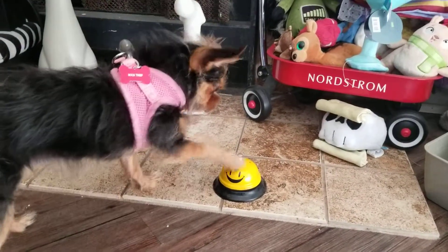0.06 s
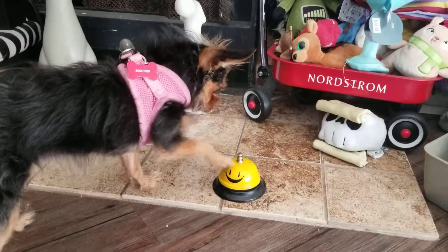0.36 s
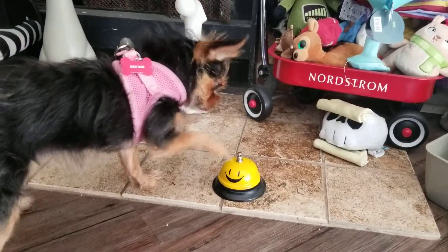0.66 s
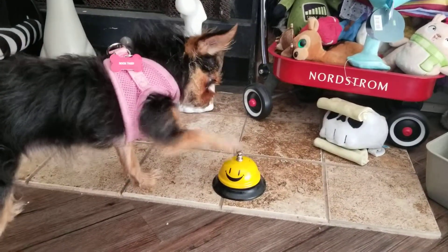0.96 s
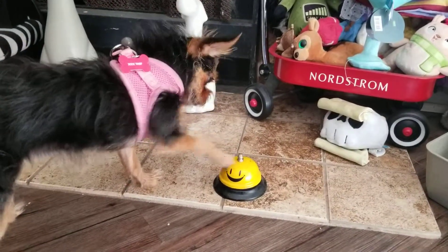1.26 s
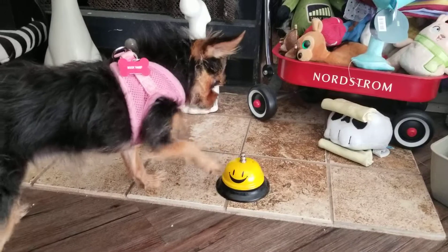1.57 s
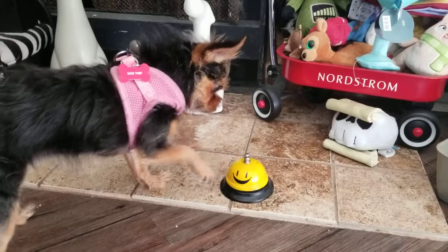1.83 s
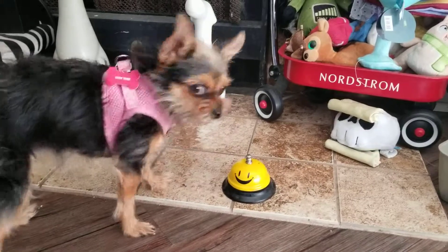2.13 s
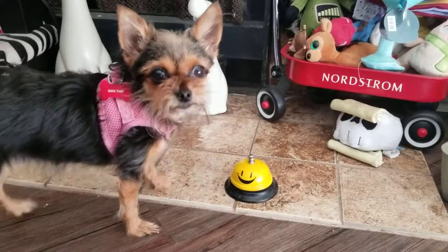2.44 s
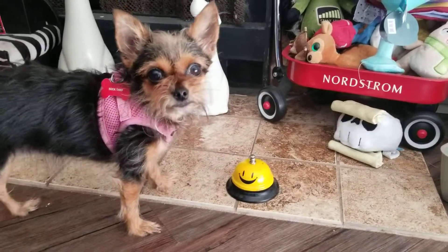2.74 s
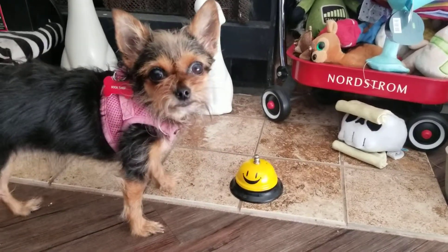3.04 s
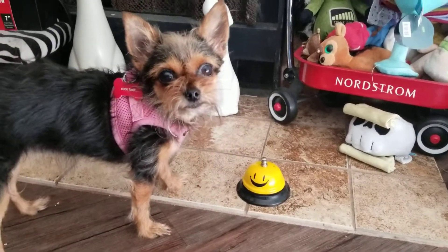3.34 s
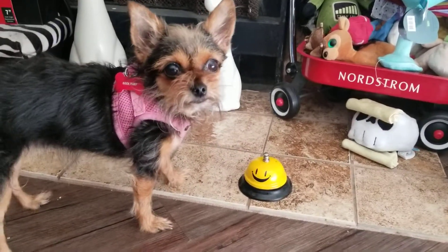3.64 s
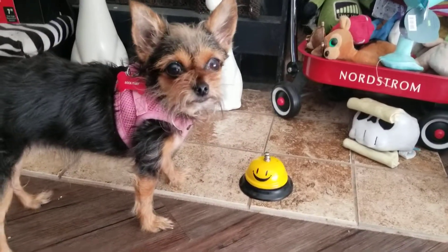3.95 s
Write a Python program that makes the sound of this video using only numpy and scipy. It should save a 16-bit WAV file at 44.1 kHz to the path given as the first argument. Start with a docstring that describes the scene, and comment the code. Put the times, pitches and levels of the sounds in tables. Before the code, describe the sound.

A small desk bell rings six times in quick succession, then fades under microphone bumps.

```python
"""Dog ringing a desk bell

A small dog paws a desk bell six times on a tiled hearth in a quiet room. A claw ticks, the
plunger rattles, the clapper clacks and the dome rings in beating pairs of modes. Up close,
fingers shift on the phone and bump and scrape its left microphone port."""
import sys
import numpy as np
from scipy import signal
from scipy.fft import rfft, irfft
from scipy.io import wavfile

SR = 44100
rng = np.random.default_rng(int(sys.argv[2]) if len(sys.argv) > 2 else 0)


def wav_out(sig):
    """Save sig, one row per channel (or a flat mono array), as 16-bit PCM at SR to the path in sys.argv[1]."""
    wavfile.write(sys.argv[1], SR, np.round(np.clip(np.atleast_2d(sig).T, -1, 1) * 32767).astype(np.int16))


N = 176400
ROOM_T60_S = .4


def undb(db):
    """Decibels to gain."""
    return 10 ** (np.asarray(db) / 20)

def clock():
    """Time of each sample in seconds."""
    return np.arange(N) / SR

def unit(x):
    """Scale to rms 1."""
    return x / np.sqrt(np.mean(x ** 2))

def colour(x, curve):
    """EQ by a curve of (f/Hz, gain/dB) points."""
    hz, db = np.array(curve).T
    f = np.maximum(np.arange(N // 2 + 1) * SR / N, 1)
    return irfft(rfft(x) * undb(np.interp(np.log(f), np.log(hz), db)), N)

def noise(curve, channels=2):
    """Coloured noise of rms 1, unrelated between channels."""
    return unit(colour(rng.standard_normal((channels, N)), curve))

def resonate(x, hz, width_hz):
    """One resonant band-pass."""
    return signal.lfilter(*signal.iirpeak(hz, hz / width_hz, fs=SR), x)

def decay(start, t60):
    """Instant attack, exponential tail."""
    age = clock() - start
    return (age >= 0) * np.exp(-np.log(1000) * np.maximum(age, 0) / t60)

def swells(rows):
    """Envelope of overlapping gestures, each a smooth rise and fall."""
    t = clock()
    return np.sqrt(sum(undb(db) ** 2 * np.exp(-2 * np.maximum((s - t) / rise, (t - s) / fall) ** 2)
                       for s, rise, fall, db in rows))

def wander(per_s):
    """Smooth random drift at each port, spread near 1."""
    steps = np.arange(N // 10)
    targets = rng.standard_normal((2, len(steps)))
    return np.array([np.interp(clock() * per_s, steps, row) for row in targets])

def shade(x, curve):
    """The hand screens the left port, dulling that side."""
    return np.array([colour(x[0], curve), x[1]])

# Room tone EQ (f/Hz, gain/dB)
ROOM_TONE_EQ = [(25, 4), (80, 0.5), (210, -5.5), (330, -17.5), (480, -14), (1000, -10.5), (2000, -12.5),
                (3300, -10.5), (6000, -17), (10000, -23), (15500, -27.5)]
# Its extra EQ on the left (f/Hz, gain/dB)
TONE_SHADE = [(1000, 4.5), (3000, -6.5), (12000, -20)]
# Faint hum lines (f/Hz, level/dB)
HUM_LINES = [(298, -63), (362, -65.5)]
def room_tone():
    """The bed: soft room noise with two wavering hum lines."""
    hum = sum(undb(db) * unit(resonate(rng.standard_normal((2, N)), hz, width_hz=1.9))
              for hz, db in HUM_LINES)
    return hum + undb(-56) * shade(noise(ROOM_TONE_EQ), TONE_SHADE)

# Shifts of grip (crest t/s, rise/s, fall/s, level/dB)
GRIPS = [(.89, 0.024, 0.055, -38.5), (1.36, 0.025, 0.081, -33.5), (1.78, .04, 0.08, -37),
         (1.96, 0.049, 0.048, -27), (2.32, 0.036, .11, -21.5), (2.66, 0.091, 0.036, -40.5),
         (2.89, 0.053, 0.19, -36.5), (3.175, 0.018, 0.023, -29.5), (3.3, 0.0059, 0.03, -37.5),
         (3.68, 0.1, 0.16, -33)]
# Case rumble EQ (f/Hz, gain/dB)
RUMBLE_EQ = [(20, -20), (45, -2.5), (90, -2), (160, -8), (300, -25), (700, -32), (2000, -72)]
def grip(hold_db=-50):
    """The hand flexes the case: a faint rumble that swells when the grip shifts."""
    return noise(RUMBLE_EQ, channels=1)[0] * np.hypot(swells(GRIPS), undb(hold_db))

# Light finger slides (crest t/s, rise/s, fall/s, level/dB)
GLIDES = [(3.2, 0.056, 0.15, -47), (3.84, 0.36, 0.082, -44)]
# Skin hiss EQ (f/Hz, gain/dB)
GLIDE_EQ = [(150, 2), (450, 1.5), (1200, -4), (2500, -11), (6000, -46.5), (12000, -38)]
def glides():
    """Skin glides beside the port with a soft, dark hiss."""
    return noise(GLIDE_EQ, channels=1)[0] * swells(GLIDES)

# Finger drags (crest t/s, rise/s, fall/s, level/dB)
SCRAPES = [(1.368, 0.018, 0.014, -31), (2.355, 0.044, 0.027, -26.5), (2.381, 0.0031, 0.0021, -17.5),
           (2.451, 0.052, 0.02, -31), (3.181, 0.0033, 0.0041, -35), (3.666, 0.027, 0.012, -22.5),
           (3.735, 0.025, 0.039, -37.5)]
# Skin crackle EQ (f/Hz, gain/dB)
CRACKLE_EQ = [(100, 4.5), (500, -3), (1500, -4.5), (4000, -7.5), (7200, -23), (10500, -15.5), (16000, -31)]
def scrapes(slips_per_s=1300, scatter_db=4.5):
    """Skin sticks and slips over the port in dense clicks of very uneven size."""
    slipping = rng.random(N) < slips_per_s / SR
    slips = slipping * undb(scatter_db * np.minimum(rng.exponential(size=N), 4))
    return unit(colour(slips - slips.mean(), CRACKLE_EQ)) * swells(SCRAPES)

# Finger bumps on the port (t/s, peak level/dB, width/ms, low cut f/Hz)
BUMPS = [(0.9502, -21, 0.23, 163), (1.046, -9, 0.62, 129), (1.3639, -18.5, 0.14, 120),
         (1.3686, -7.5, 0.078, 130), (1.4294, -10, 0.16, 222), (1.6925, -25.5, 0.53, 131),
         (1.9393, -13, 0.78, 107), (2.195, -24, 0.071, 300), (2.227, -23, 0.055, 300),
         (2.302, -6, 0.058, 81.5), (2.3111, -11.5, 1.3, 45.3), (2.3329, -0.5, 0.056, 90),
         (2.3369, -2.5, 0.25, 158), (2.3474, -7, 0.041, 200), (2.3529, -13, 0.04, 400),
         (2.3824, -8.5, 0.035, 397), (2.4396, -12, 0.04, 297), (2.449, -16, 0.022, 400),
         (2.543, -29.5, 0.46, 195), (2.8636, -14, 0.23, 60), (2.9286, -21, 0.13, 88),
         (3.116, -16.5, 0.11, 424), (3.1811, -12, 0.11, 606.5), (3.462, -18.5, 0.064, 147),
         (3.6208, -10.5, 0.054, 132), (3.6286, -4, 0.071, 128), (3.6301, -4.5, 0.1, 416),
         (3.6583, -2, 0.064, 200), (3.6702, -2, 0.73, 92), (3.728, -17.5, 0.026, 1230),
         (3.7333, -15, 0.024, 1250), (3.793, -25.5, 0.6, 117), (3.97, -31.5, 0.36, 181)]
def bumps():
    """Each touch is one pressure pulse that swings back as the air leaks from the port."""
    t, out = clock(), np.zeros(N)
    for s, db, width_ms, low_hz in BUMPS:
        near = abs(t - s) < .1
        widths_away = np.minimum(abs(t[near] - s) * 1000 / width_ms, 50)
        leak = signal.butter(2, low_hz, "high", fs=SR, output="sos")
        pulse = signal.sosfilt(leak, 1 / np.cosh(widths_away))
        out[near] += undb(db) * pulse / abs(pulse).max()
    return out

# Claw hit (t/s, level/dB)
TICKS = [(0.105, -30)]
# Tick EQ (f/Hz, gain/dB)
TICK_EQ = [(2000, -26), (7000, -16), (15000, 6)]
def claw():
    """A claw meets the tile with a tiny, dry, bright tick."""
    return noise(TICK_EQ) * sum(undb(db) * decay(s, t60=.0092) for s, db in TICKS)

# Short resonances of plunger and clapper (f/Hz, width/Hz, gain/dB)
WORKS = [(3016, 110, 14.5), (4520, 54, 11.5), (4910, 77, 0.5), (6050, 44, 5.5), (10630, 34, 6)]
def clatter(curve, chatter_db=5):
    """Chattering contact noise rings the bell's works: the texture of rattle and clack."""
    contact = noise(curve) * undb(chatter_db * wander(per_s=180)[0])
    return unit(contact + sum(undb(db) * resonate(contact, hz, width) for hz, width, db in WORKS))

# Paw on the plunger, and the plunger springing back (t/s, level/dB)
RATTLES = [(.1, -52), (0.285, -42.5), (0.336, -35), (0.583, -34), (0.67, -43), (0.786, -35), (0.923, -37),
           (1.011, -41.5), (1.242, -44.5), (1.46, -38.5), (1.525, -33), (1.761, -31), (1.829, -36)]
# Rattle EQ (f/Hz, gain/dB)
RATTLE_EQ = [(300, -11), (900, -0.5), (1450, 10.5), (2300, -0.5), (4800, 6.5), (8000, 2.5), (11500, -1),
             (15000, 2)]
def rattles(tail_db=-3):
    """The plunger rattles in tight bursts, each with a room tail."""
    power = sum(undb(db) ** 2 * (decay(s, t60=.03) ** 2 + (undb(tail_db) * decay(s, ROOM_T60_S)) ** 2)
                for s, db in RATTLES)
    return np.sqrt(power) * clatter(RATTLE_EQ)

def tinkles(modes=36, band_hz=(3600, 15500), attack_s=.004, t60=.16, trim_db=-2.5):
    """Each rattle rings a fresh cluster of short, high modes in the loose metal parts."""
    out, age = np.zeros((2, N)), np.arange(SR // 8) / SR
    envelope = (1 - np.exp(-age / attack_s)) * np.exp(-np.log(1000) * age / t60)
    for s, db in RATTLES:
        hz = np.exp(rng.uniform(*np.log(band_hz), (modes, 1)))
        size = rng.exponential(size=(modes, 1))
        partials = size * np.sin(2 * np.pi * (hz * age + rng.random((2, modes, 1))))
        ring = partials.sum(axis=1) / np.sqrt(np.sum(size ** 2) / 2)
        start = int(s * SR)
        out[:, start:start + len(age)] += undb(db + trim_db) * ring * envelope
    return out

# Hits on the bell (t/s, level/dB, ping boost/dB, shrill boost/dB, clack and high-mode boost/dB)
STRIKES = [(0.3228, -10, 2, 0, 17), (0.5723, -6, 6.5, 0.5, 14.5), (0.8193, -4, -1.5, 2, 9),
           (1.268, 0, 0.5, 0, 9), (1.486, -3, 6.5, 4.5, 15), (1.7328, -2.5, 5, 2, 8)]
# Clack EQ (f/Hz, gain/dB)
CLACK_EQ = [(200, -34), (800, -28.5), (1400, -1.5), (2300, -17.5), (3600, -5), (4900, 2.5), (6400, 5),
            (7400, -2.5), (10000, -4), (11500, 3.5), (13500, -13), (15500, 2.5)]
def clacks(dry_db=-26, tail_db=-39.5):
    """The clapper hits the dome: a hard transient with a quiet room tail."""
    power = np.zeros(N)
    for s, db, _, _, bright in STRIKES:
        hit = undb(dry_db) * decay(s, t60=.028)
        tail = undb(tail_db) * decay(s, t60=.46)
        power += undb(db + bright) ** 2 * (hit ** 2 + tail ** 2)
    return np.sqrt(power) * clatter(CLACK_EQ)

def bell_base(hz=1342, width_hz=280, lag_s=.0039, spread_s=.026):
    """The base sounds a short midrange swell while the plunger goes down."""
    press = sum(np.exp(-((clock() - s - lag_s) / spread_s) ** 2 / 2) for s, *_ in STRIKES)
    band = resonate(rng.standard_normal((2, N)), hz, width_hz)
    return undb(-47) * press * unit(resonate(band, hz, width_hz))

# Reverb send EQ for the ring (f/Hz, gain/dB)
SEND_EQ = [(1000, -25.5), (5700, -18), (11000, -14)]
def reverb(ring):
    """The room returns a diffuse tail, different at each port."""
    tail = rng.standard_normal((2, N)) * decay(.0099, ROOM_T60_S)
    tail /= np.sqrt(np.sum(tail ** 2) / 2)
    return signal.fftconvolve(colour(ring, SEND_EQ), tail, axes=1)[:, :N]

PING_MODE, SHRILL_MODE, HIGH_MODES_HZ = 1, 2, 8000
FLASH_DB, FLASH_S = 3, .036
WAVER_PER_S, WAVER_DB, WAVER_RAD, WAVER_ONSET_S = 55, 3.5, 1.1, .02
# Dome mode pairs (f/Hz, twin offset/Hz, t60/s, twin t60/s)
DOME_MODES = [(1066.8, 11.75, 4.2, 4.4), (3024.4, -10.5, 2.05, 3.1), (5739.4, 23, 1.1, 1.0),
              (9001.5, -21.5, .4, .4), (11151, 45, .3, .28), (12130, -87, .2, .2), (12372, -15, .3, .3),
              (15358, 39, .19, .19)]
# Mix of each pair (left level/dB, right level/dB, twin relative to each: left/dB, right/dB)
DOME_MIX = [(-40.5, -41, -3, -4.5), (-40.5, -25.5, -6.5, -15.5), (-38, -20, -19.5, -25),
            (-46.5, -32.5, 4.5, -0.5), (-52.5, -34.5, 2, -11.5), (-60.5, -47, 0.5, -7),
            (-58, -30.5, -2, -11.5), (-51.5, -32, -11.5, -9.5)]
def dome(attack_s=.00098, left_lag_s=.00017):
    """Each hit sets the dome's modes ringing afresh, and every mode beats against its twin."""
    t, out = clock(), np.zeros((2, N))
    slew = np.exp(-1 / (attack_s * SR))
    for k, (hz, split, t60, twin_t60) in enumerate(DOME_MODES):
        left, right, twin_left, twin_right = DOME_MIX[k]
        high = hz > HIGH_MODES_HZ
        size, since = np.zeros(N), np.zeros(N)
        for s, db, ping, shrill, bright in STRIKES:
            boost_db = ping * (k == PING_MODE) + shrill * (k == SHRILL_MODE) + bright * high
            size = np.where(t >= s, undb(db + boost_db), size)
            since = np.where(t >= s, t - s, since)
        # high modes start louder, until the clapper leaning on the dome muffles them
        size *= undb(high * FLASH_DB * np.exp(-since / FLASH_S))
        main, twin = (signal.lfilter([1 - slew], [1, -slew], size * np.exp(-np.log(1000) * since / life))
                      for life in (t60, twin_t60))
        # low modes keep their phase through the next hit; high pairs restart in step
        age = since if high else t - STRIKES[0][0]
        phase = 2 * np.pi * hz * (age - np.array([[left_lag_s], [0]]))
        # high modes waver in level and phase, differently at each port, as movement shifts reflections
        waver = high * (1 - np.exp(-since / WAVER_ONSET_S))
        beat = 2 * np.pi * split * age + waver * WAVER_RAD * wander(WAVER_PER_S)
        pair = main * np.sin(phase) + undb([[twin_left], [twin_right]]) * twin * np.sin(phase + beat)
        out += undb(np.array([[left], [right]]) + waver * WAVER_DB * wander(WAVER_PER_S)) * pair
    return out

# Left-side EQ for the mechanical noises from the floor (f/Hz, gain/dB)
FLOOR_SHADE = [(1200, 3.5), (3000, -2), (6000, -21.5), (12000, -20)]
def scene():
    """The mix: bell, claw and room tone in stereo, handling noise hard left."""
    ring = dome()
    wet = reverb(ring)
    mechanics = shade(bell_base() + clacks() + rattles() + tinkles() + claw(), FLOOR_SHADE)
    handling = (bumps() + scrapes() + glides() + grip()) * undb([[0], [-45.5]])
    return room_tone() + handling + mechanics + ring + wet

def record(dry):
    """The phone clips at full scale and cuts the top above 16 kHz."""
    high_cut = signal.ellip(10, .2, 80, 16000, fs=SR, output="sos")
    return signal.sosfilt(high_cut, np.clip(dry, -1, 1))

dry = scene()
out = record(dry)
wav_out(out)
```